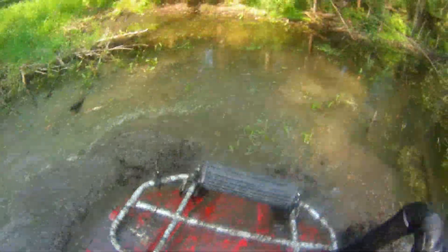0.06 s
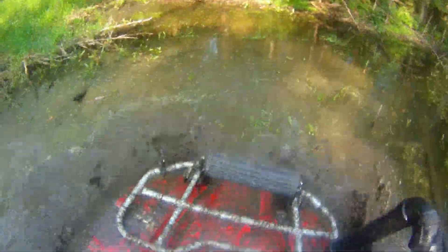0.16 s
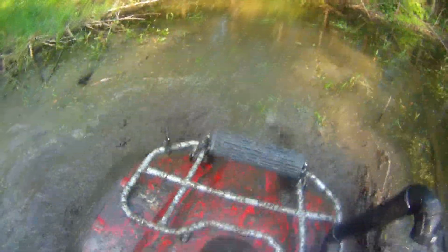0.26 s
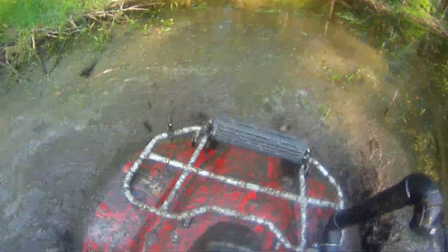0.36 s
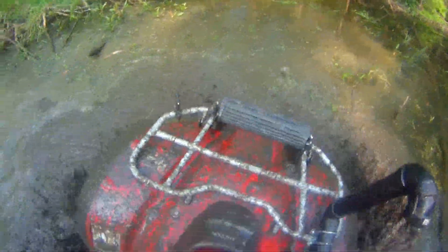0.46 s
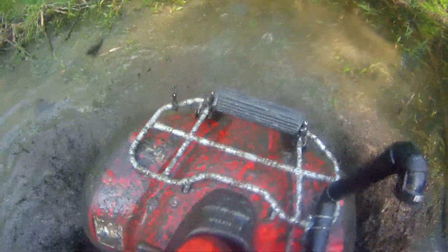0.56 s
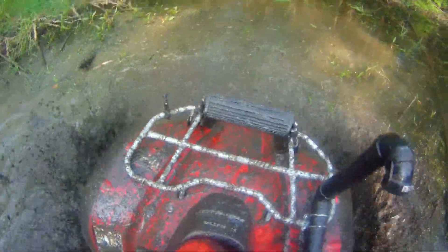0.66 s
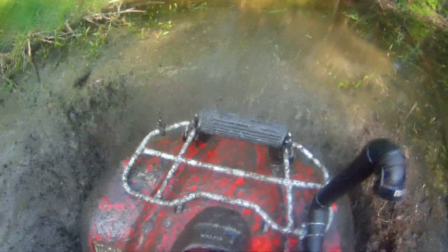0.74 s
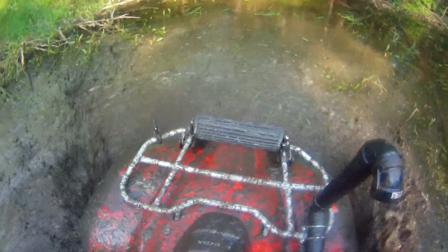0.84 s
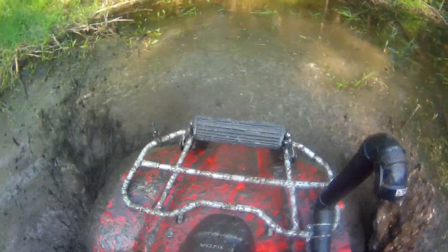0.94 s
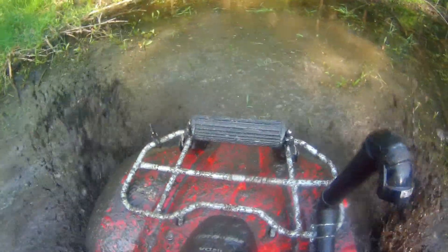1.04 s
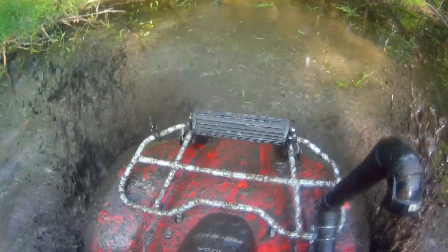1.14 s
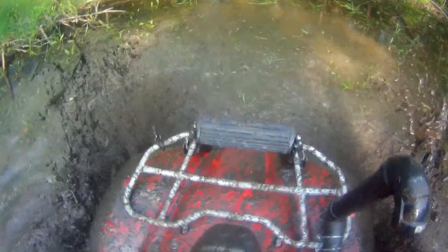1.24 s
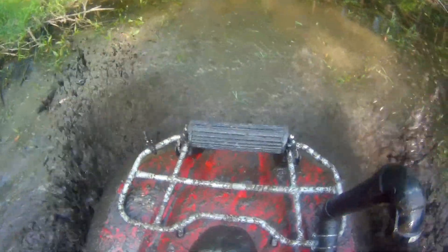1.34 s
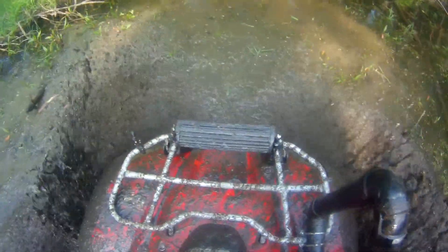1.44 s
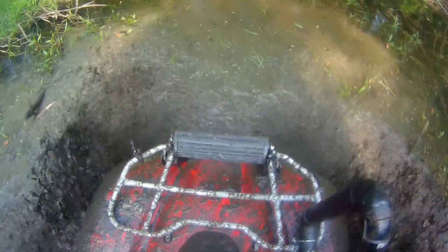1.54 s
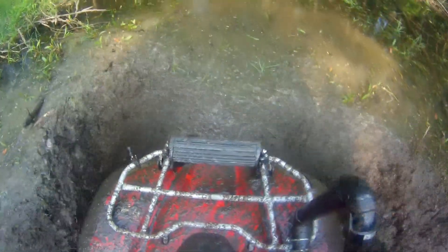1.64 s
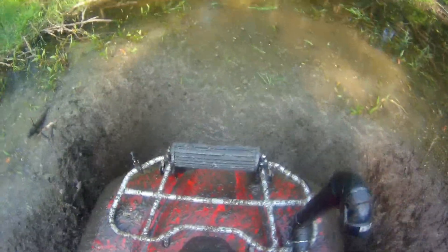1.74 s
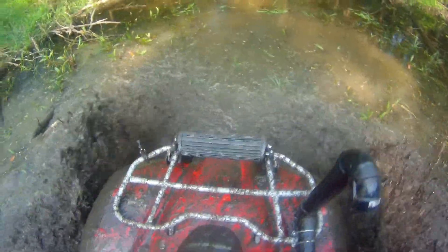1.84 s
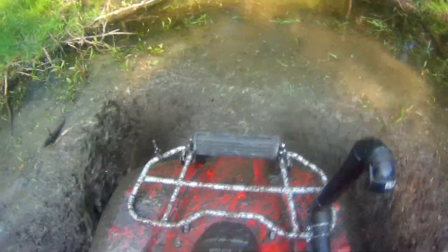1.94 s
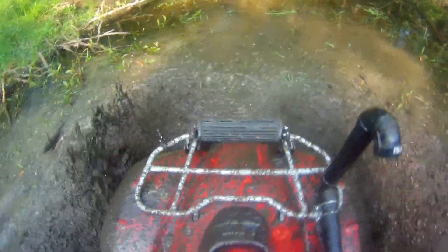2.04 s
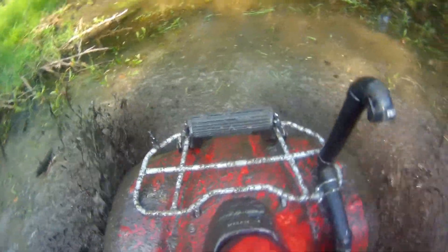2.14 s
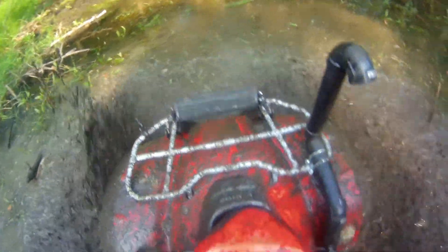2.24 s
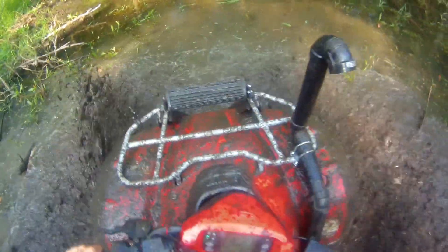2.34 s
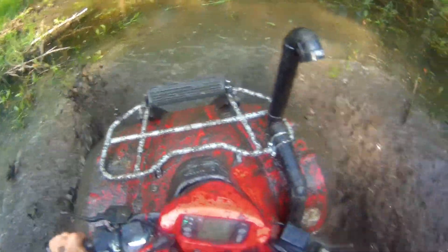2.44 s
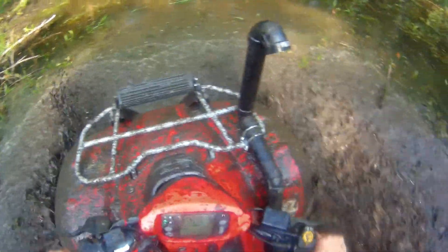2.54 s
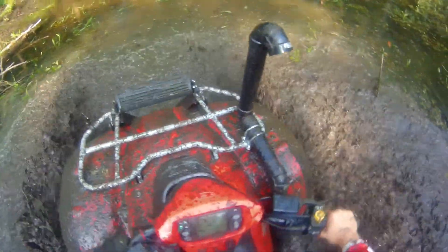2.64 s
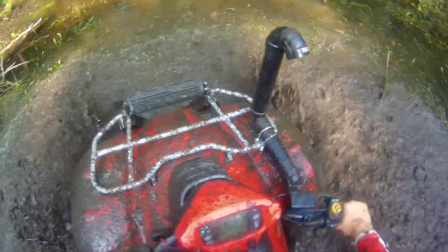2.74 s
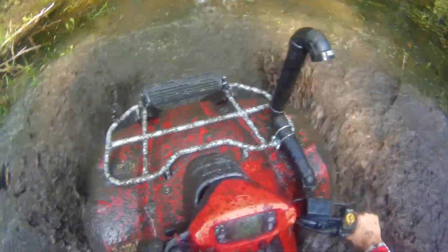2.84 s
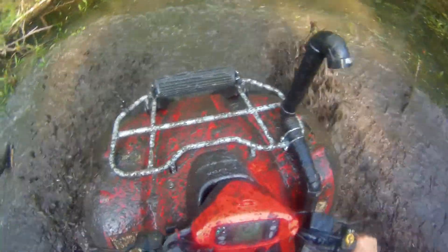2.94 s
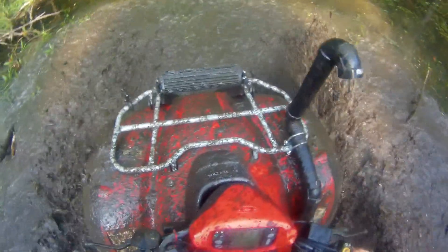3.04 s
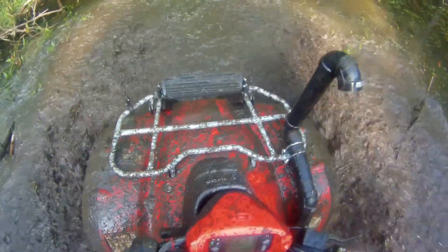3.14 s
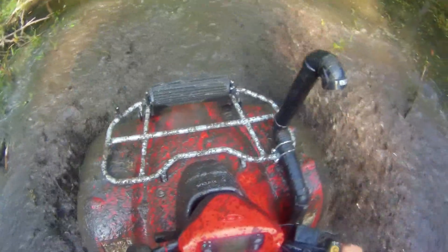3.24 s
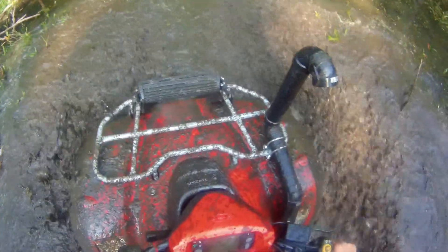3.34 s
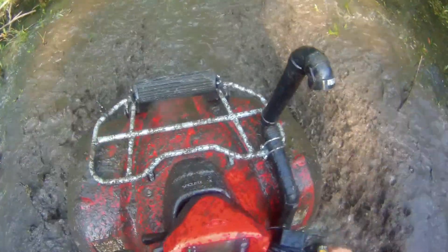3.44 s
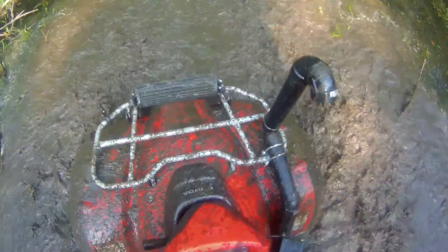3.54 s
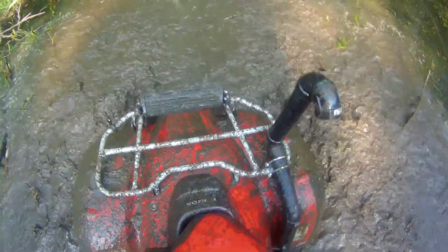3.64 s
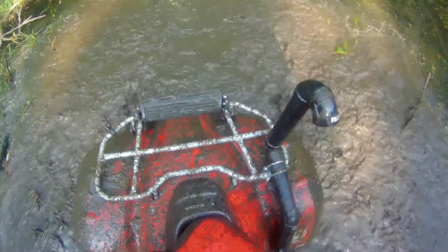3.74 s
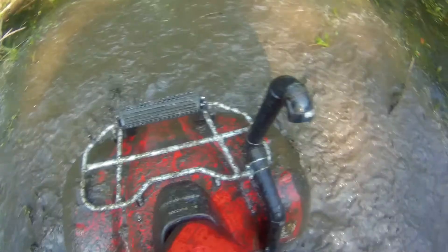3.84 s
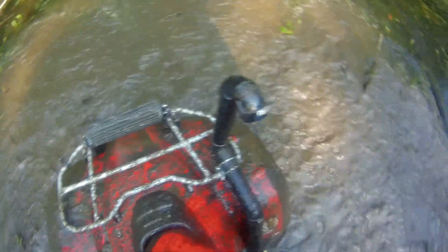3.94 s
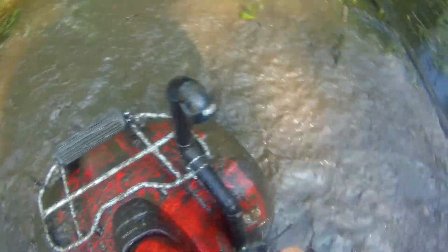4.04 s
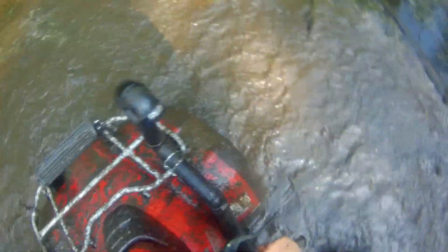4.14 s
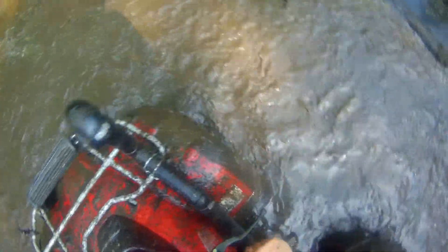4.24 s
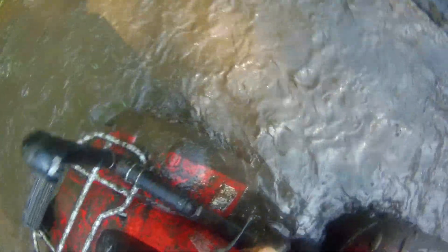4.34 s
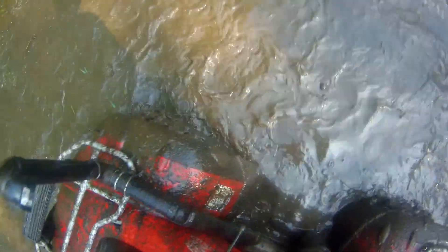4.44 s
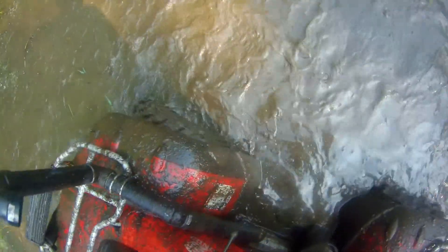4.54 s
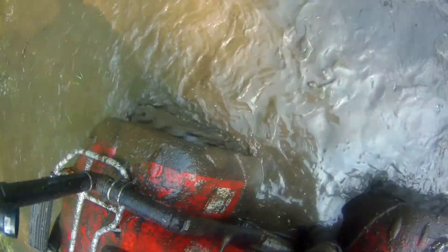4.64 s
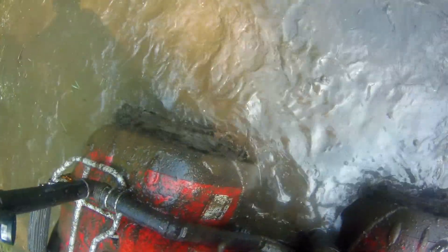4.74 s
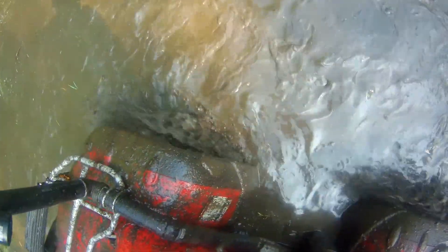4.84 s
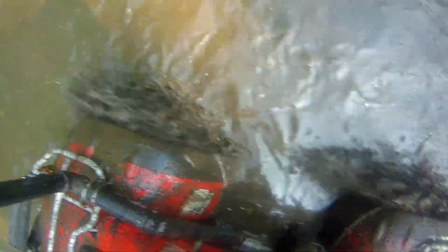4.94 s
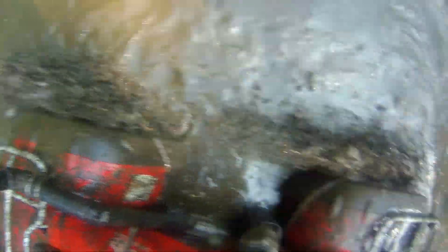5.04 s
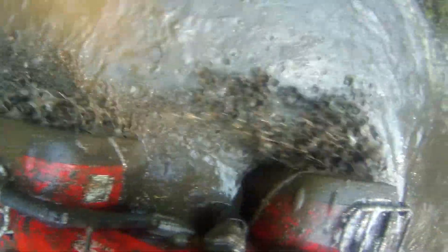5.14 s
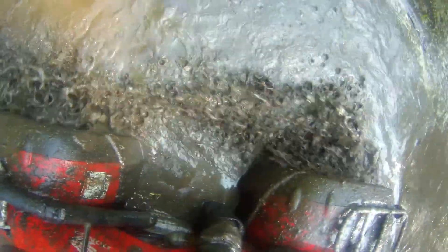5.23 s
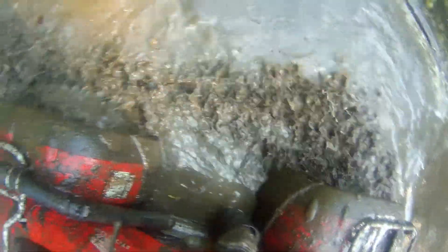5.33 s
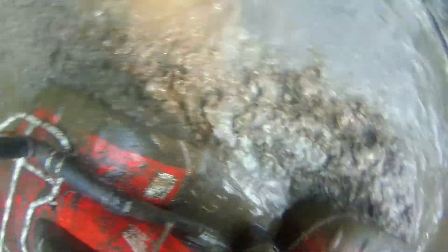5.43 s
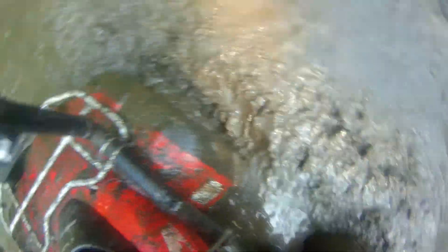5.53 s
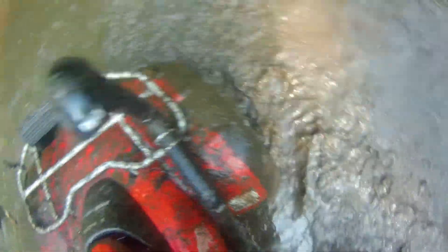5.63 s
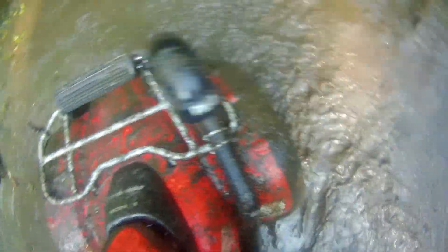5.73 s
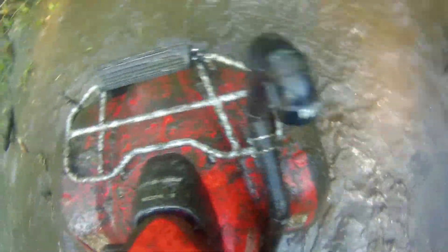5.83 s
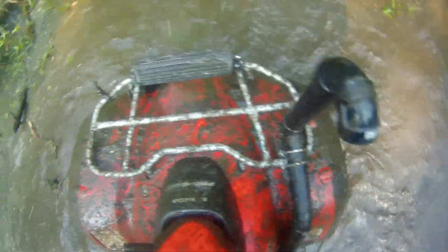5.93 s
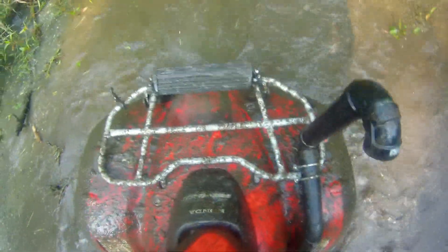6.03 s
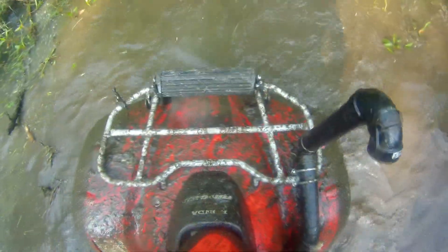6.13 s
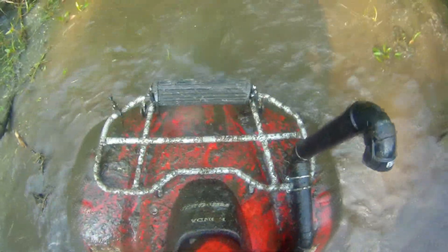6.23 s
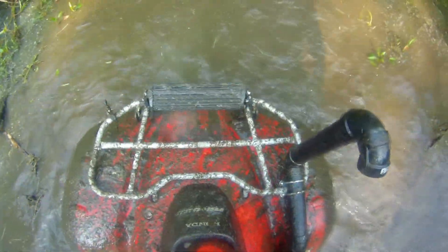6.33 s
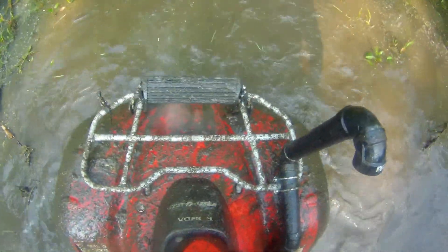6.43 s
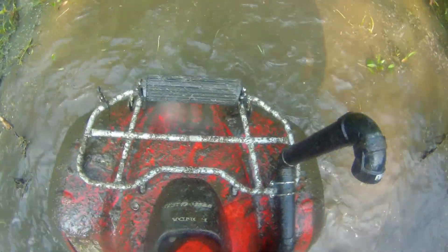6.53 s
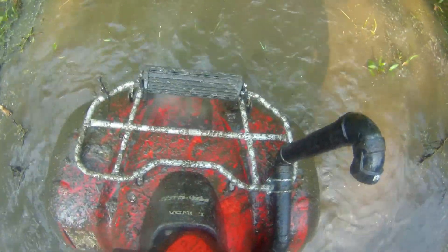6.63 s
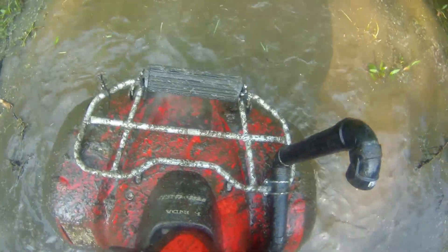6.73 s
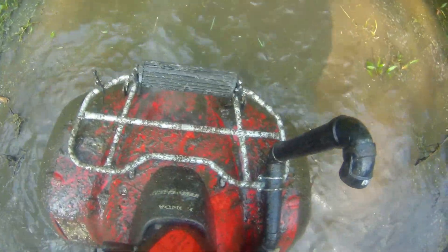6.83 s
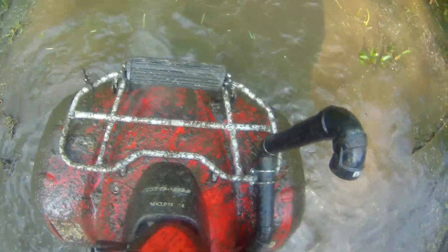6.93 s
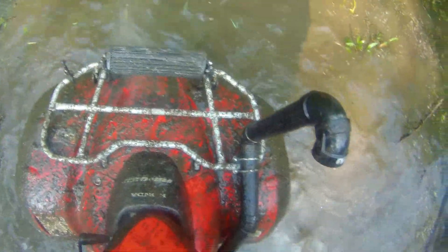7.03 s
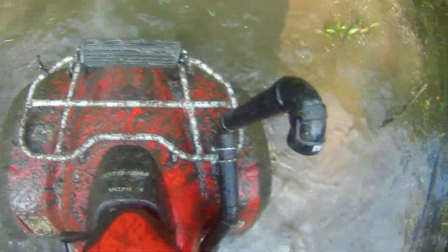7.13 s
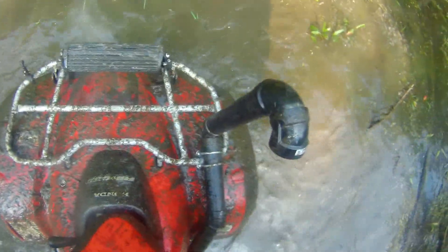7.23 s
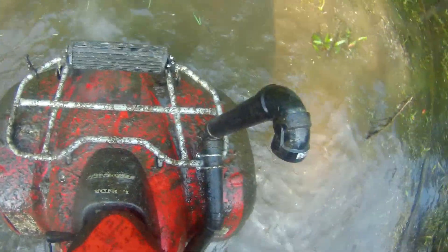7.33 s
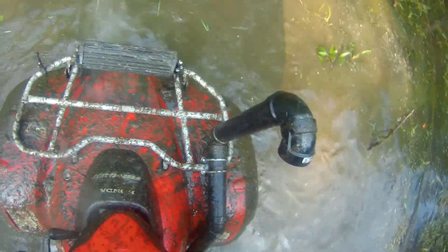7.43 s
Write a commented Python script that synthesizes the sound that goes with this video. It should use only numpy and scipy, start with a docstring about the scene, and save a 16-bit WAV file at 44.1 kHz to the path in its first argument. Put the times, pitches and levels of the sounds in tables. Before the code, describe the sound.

A quad bike's single-cylinder engine holds a harsh, buzzing full-throttle drone for about three seconds while tyres fling hissing mud and water. The throttle snaps shut, the note sinks to separate thumps with a grinding wet rasp, then comes a small blip, a strong barking one and, after a near stall, a last short double squeeze before slow idling. Close on the rider, outdoors, boxed in by a hollow waterproof case.

```python
"""A single-cylinder quad bike pulls at full throttle through a mud hole: a rough, droning engine note.
After three seconds it drops to a thumping idle, is blipped three times and almost stalls.
The engine is built from tones and from clicks and bursts of noise, one per firing, that ring resonances.
Shaped noise makes the mud and water flung by the tyres, and short ringing noises make clods and droplets.
It is heard inside a waterproof camera case, which adds hollow resonances to many layers and echoes the treble."""
import sys
import numpy as np
from scipy import signal
from scipy.fft import rfft, irfft
from scipy.io import wavfile
from scipy.ndimage import uniform_filter1d

SR = 44100
rng = np.random.default_rng(int(sys.argv[2]) if len(sys.argv) > 2 else 0)


def wav_out(sig):
    """Save sig, one row per channel (or a flat mono array), as 16-bit PCM at SR to the path in sys.argv[1]."""
    wavfile.write(sys.argv[1], SR, np.round(np.clip(np.atleast_2d(sig).T, -1, 1) * 32767).astype(np.int16))


N = 329868
TIME = np.arange(N) / SR

# bands used to set layer levels: (lowest [Hz], highest [Hz])
BASS, LOW, MID, TOP, ALL = (60, 180), (220, 900), (1050, 2600), (7500, 14000), (20, 16000)


def gain_of(db):
    """Turns decibels into an amplitude factor."""
    return np.exp(np.asarray(db) * (np.log(10) / 20))


def evened(x):
    """Scales a sound to an rms of one."""
    return x / np.sqrt(np.mean(x ** 2) + 1e-20)


def curve(rows, column=1):
    """Joins one column of a table by straight lines in time."""
    table = np.array(rows)
    return np.interp(TIME, table[:, 0], table[:, column])


def wander(hz, size=4096):
    """Slow random wavering of rms one; movement faster than about hz fades out."""
    f = np.fft.rfftfreq(size, N / SR / size)
    slow = irfft(rfft(rng.standard_normal(size)) * np.exp(-(f / hz) ** 2))
    return evened(np.interp(TIME, np.linspace(0, N / SR, size), slow))


def swell(s, rise_s, fall_s):
    """A smooth hump of height one at s seconds."""
    distance = (TIME - s) / np.where(TIME < s, rise_s, fall_s)
    return np.exp(-np.minimum(distance ** 2, 20))


def causal(gain):
    """Gives a set of gains the phase of something struck: a sudden start, then ringing."""
    log_gain = np.log(np.maximum(gain, 1e-5))
    circle = np.concatenate([log_gain, log_gain[-2:0:-1]])
    return np.exp(np.conj(signal.hilbert(circle)))[:len(gain)]


# hollow resonances of the camera case: (pitch [Hz], width [Hz], lift [dB])
CASE_RESONANCES = [(372, 34, 5.5), (1183, 70, 5.5), (1302, 103, 11.5), (1636, 123, 11), (1760, 50, 11.5),
                   (1935, 120, 9), (2390, 90, 10), (3530, 2740, 5), (6180, 960, 3.5), (10860, 2550, 9.5)]


def heard(x, spectrum, band, size=8192):
    """Colours a sound by its own spectrum and by the case, with rms one inside the band."""
    f = np.fft.rfftfreq(size, 1 / SR)
    hz, db = np.transpose(spectrum)
    own_gain = gain_of(np.interp(np.log(f + 1), np.log(hz), db))
    case_power = 1
    for at, width, lift in CASE_RESONANCES:
        case_power = case_power + (gain_of(lift) ** 2 - 1) / (1 + (2 * (f - at) / width) ** 2) ** 2
    coloured = signal.oaconvolve(x, irfft(causal(own_gain * np.sqrt(case_power))))[:N]
    f = np.fft.rfftfreq(N, 1 / SR)
    inside = rfft(coloured)[(f > band[0]) & (f < band[1])]
    return coloured * N / np.sqrt(2 * np.sum(abs(inside) ** 2))


def resonate(x, hz, width):
    """A resonance whose pitch may follow a curve."""
    turn = np.exp(2j * np.pi * np.cumsum(hz * np.ones(len(x))) / SR)
    r = np.exp(-np.pi * width / SR)
    return 2 * (turn * signal.lfilter([1 - r], [1, -r], x / turn + 1e-18)).real


def ringing(x, hz, width):
    """A fixed resonance with steep sides, rms one."""
    pole = np.exp((2j * np.pi * hz - np.pi * width) / SR)
    stage = [1, -pole.real, 0, 1, -2 * pole.real, abs(pole) ** 2]
    return evened(signal.sosfilt([stage, stage], x + 1e-18))


# engine speed through the pull, the blips and the near stall: (time [s], rate [firings per s])
ENGINE_SPEED = [(0.0, 37.49), (0.302, 38.86), (1.003, 41.02), (1.301, 40.47), (1.697, 40.94),
                (2.596, 38.47), (3.085, 39.0), (3.113, 26.55), (3.405, 14.88), (3.766, 21.27),
                (4.239, 11.84), (4.547, 27.78), (4.866, 33.54), (5.21, 11.57), (5.458, 8.23), (5.774, 9.55),
                (6.183, 24.25), (6.639, 12.43), (7.153, 12.78), (7.277, 9.06), (7.48, 11.01)]


def firings(turns, uneven_db):
    """One click per firing, of uneven strength, with the same mean power at any speed."""
    at = np.flatnonzero(np.diff(np.floor(turns)))
    strength = gain_of(uneven_db * rng.standard_normal(len(at)))
    clicks = np.zeros(N)
    clicks[at] = strength / np.sqrt(curve(ENGINE_SPEED)[at])
    return clicks


def gusts(turns, decay_s, steady, rise_s=.0008):
    """Noise that swells quickly at each firing and dies down to a steady share."""
    speed = curve(ENGINE_SPEED)
    age = (turns % 1) / speed  # seconds since the last firing
    puff = (1 - np.exp(-age / rise_s)) * np.exp(-age / decay_s) * (1 + rise_s / decay_s)
    power = steady ** 2 + speed * decay_s * (2 * steady + .5)
    return (steady + puff) / np.sqrt(power) * rng.standard_normal(N)


# squeezes of the throttle, one long pull and three blips, the last squeezed twice:
# (opens [s], shuts [s], opening [0-1], release [s],
#  pipe boom [dB], thump [dB], silencer chambers [dB], clatter [dB])
SQUEEZES = [(-1, 3.095, 1, .035, -.5, 0, 0, -.5), (3.45, 3.84, .39, .07, .3, 1.2, -2.5, -.5),
            (4.265, 4.93, .98, .038, -.8, .5, -1, .6), (5.92, 6.05, .85, .11, .1, -3, 2.5, 2.2),
            (6.12, 6.285, .33, .04, -.8, -4, 2, .5)]
BOOMS, THUMPS, CHAMBERS, CLATTERS = 4, 5, 6, 7  # places of the four level columns
OPEN_S = .085  # how quickly the engine answers the throttle


def throttle():
    """Throttle opening, 0-1: each squeeze rises, holds and dies away."""
    out = 0
    for opens, shuts, opening, release, *_ in SQUEEZES:
        rise = 1 - np.exp(-np.maximum(TIME - opens, 0) / OPEN_S)
        out = out + opening * rise * np.exp(-np.maximum(TIME - shuts, 0) / release)
    return np.clip(out, 0, 1)


def squeezed(column):
    """Gain from one level column of the squeezes: each holds until the throttle next opens."""
    rows = np.array(SQUEEZES)
    db = rows[np.searchsorted(rows[:, 0], TIME) - 1, column]
    return gain_of(uniform_filter1d(db, SR // 20))


FULL_HZ = 32  # firing rate above which speed adds no more loudness in the laws below


def loudness(law, gas):
    """Level in dB: lower at slow engine speeds, and changed by shutting the throttle."""
    top_db, shut_db, open_slope, shut_slope = law
    shut = 1 - gas
    octaves = np.maximum(np.log2(FULL_HZ / curve(ENGINE_SPEED)), 0)
    return top_db + shut * shut_db - octaves * (open_slope + shut * (shut_slope - open_slope))


# share of full load on the engine: (time [s], load [0-1])
ENGINE_LOAD = [(0, 0.95), (3.085, 1), (3.115, 0)]
# drone tones: (multiple of the firing rate, level when lugging [dB], level when running free [dB])
DRONE_ORDERS = [(1, -48.9, -47.1), (2, -54.9, -49.8), (3, -32.6, -32.6), (4, -48, -42), (5, -43.5, -40.2),
                (6, -50.9, -46.4), (7, -41.4, -36.2), (8, -54.7, -50.1), (9, -54.8, -37.7),
                (10, -49.7, -47.3), (11, -44.5, -45.2), (12, -52.0, -48.5), (13, -53.5, -61.2),
                (14, -65.7, -52.1), (15, -51.4, -49.7), (16, -57.9, -54.2), (17, -49.4, -49),
                (18, -48, -46.5), (19, -57.5, -61.5), (20, -54.8, -59.4), (21, -59.1, -56.2),
                (22, -57.3, -60.7), (23, -54.0, -52.3), (24, -55.5, -47.6), (25, -61.0, -60.4),
                (26, -58.8, -59.9), (27, -57, -51), (30, -52, -51), (34, -53, -52), (36, -59, -61),
                (39, -64, -64), (41, -53, -52), (44, -54, -53)]
# tones that swell or fade as the rider moves about the machine:
# (time [s], half length [s], multiple of the firing rate, change [dB])
ORDER_SWELLS = [(0.09, 0.25, 10, 13.7), (0.916, 0.3, 9, -4), (1.643, 0.41, 9, 2.5), (1.024, 0.11, 11, 5),
                (1.15, 0.16, 12, 4), (1.98, 0.19, 7, -7), (.18, .16, 34, 9), (.47, .4, 33, 12),
                (.35, .2, 42, 13), (.7, .2, 29, 7), (1.15, .22, 41, 12), (1.55, .3, 43, 7),
                (2.1, .2, 34, 11), (2.3, .3, 30, 10), (2.38, .12, 31, 10), (2.92, .22, 30, 11),
                (2.92, .15, 34, 7)]
LUGGING_HZ, FREE_HZ = 39.25, 40.5  # firing rates for the two balances of tones
ROUGH_PER_ORDER = .018  # turbulent gas blurs the high orders most [radians of waver per order]
STROKE_DB = 1.5  # uneven burning shakes the upper orders from stroke to stroke


def drone(turns, waver_db=2.0, drone_db=-0.1, dispersion=.11, jitter_turns=.0022):
    """Under load the pipe pulses merge into multiples of the firing rate (orders), balanced by speed."""
    listed, lugging, running = np.transpose(DRONE_ORDERS)
    orders = np.arange(1, listed[-1] + 1)
    lugging_db = np.interp(orders, listed, lugging)
    free_db = np.interp(orders, listed, running)
    free = np.clip((curve(ENGINE_SPEED) - LUGGING_HZ) / (FREE_HZ - LUGGING_HZ), 0, 1)
    phases = np.angle(causal(gain_of(np.pad(free_db, 1, "edge"))))[1:]
    wavers = [wander(7) for _ in range(7)]
    strokes = [wander(24) for _ in range(4)]
    cycle = turns % 1 + jitter_turns * wander(18)  # no two strokes take quite the same time
    out = np.zeros(N)
    for k in range(len(orders)):
        db = lugging_db[k] + free * (free_db[k] - lugging_db[k])
        db += waver_db * min((k + 1) / 10, 1) * wavers[k % len(wavers)]  # low orders are steadiest
        db += STROKE_DB * np.clip((k - 2) / 5, 0, 1) * (strokes[k // 3 % len(strokes)] - .4)
        for s, half, order, lift in ORDER_SWELLS:
            if round(order) == k + 1:
                db += lift * swell(s, half, half)
        lag = dispersion * (k + 1) ** 2  # the silencer smears each pulse: high orders leave later
        lag = lag + ROUGH_PER_ORDER * (k + 1) * wander(14)
        angle = 2 * np.pi * (k + 1) * cycle + phases[k] - lag
        out += gain_of(np.float32(db)) * np.cos(np.float32(angle))
    return np.sqrt(2) * gain_of(drone_db) * out * curve(ENGINE_LOAD)


def rattle(clicks, t60, build_s=.004, drift_hz=1.3, size=3000, count=3):
    """Each firing shakes frame and panels: a short dense ring that changes as the rider sways."""
    out, t = 0, TIME[:size]
    for _ in range(count):
        ring = rng.standard_normal(size) * gain_of(-60 * t / t60) * (1 - np.exp(-t / build_s))
        out = out + signal.oaconvolve(clicks * wander(drift_hz), ring / np.linalg.norm(ring))[:N]
    # the sway changes the colour while the slow level stays that of the clicks
    out_level = np.sqrt(uniform_filter1d(out ** 2, SR // 3) + 1e-12)
    click_level = np.sqrt(uniform_filter1d(clicks ** 2, SR // 3) + 1e-12)
    return evened(out / (out_level / click_level))


# colour of the knock, and of the ground mud later: (pitch [Hz], relative level [dB per Hz])
KNOCK_SPECTRUM = [(100, -65), (500, 2), (800, -4), (1120, 12), (1300, 9), (1480, 4), (2200, 0),
                  (2700, -6.5), (4200, -11.5), (5000, -25), (7000, -37), (11000, -43), (15000, -55)]
# colour of the rasp: (pitch [Hz], relative level [dB per Hz])
RASP_SPECTRUM = [(60, -7), (200, -2), (450, 1), (540, -5), (700, -1), (850, -4), (1150, 2), (1480, -1),
                 (2200, 1), (2700, -4), (4200, -5), (5000, -20), (7000, -13), (11000, -48), (15000, -40)]
# clatter loudness: (flat out [dB], change with throttle shut [dB],
#  loss per octave of speed when open [dB], the same when shut [dB])
CLATTER_LOUDNESS = (-32.8, -11.5, 22, 14.5)
# two howls of the intake snorkel, upper then lower:
# (pitch [Hz], width [Hz], level beside the clatter before flares and flutter [dB])
INTAKE_HOWLS = [(1645, 140, -12.5), (1290, 80, -15)]
# moments when the howl flares: (time [s], half length [s], lift of the upper [dB], lift of the lower [dB])
HOWL_FLARES = [(.22, .08, 0, 5), (.303, .012, 10, 3), (.382, .014, 8, 0), (.35, .14, 4, 0), (.6, .22, 0, 6),
               (1.2, .2, 5, 0), (4.55, .12, 0, 8), (4.803, .012, 0, 6), (4.86, .1, 5, 9),
               (6.08, .08, 11, 6), (6.28, .1, 6, 8), (7.1, .35, 9, 0)]
HOWL_FLUTTER_DB = 3


def clatter(turns, gas, knock_db=-7, knock_load_db=-2.5, rasp_db=-5.3, rasp_load_db=2):
    """Burning knocks ring the frame; gas and moving parts rasp in step, and the snorkel howls."""
    level_db, load = loudness(CLATTER_LOUDNESS, gas), curve(ENGINE_LOAD)
    effort = np.clip((level_db + 55) / 20, .2, 1)
    clicks = firings(turns, uneven_db=.8)
    # with less effort the knock softens; the rasp evens out both at idle and under full load
    knock = heard(rattle(clicks, t60=0.13), KNOCK_SPECTRUM, MID)
    knock = knock * effort * gain_of(knock_db + knock_load_db * load)
    rasp = heard(gusts(turns, decay_s=.011, steady=(.45 + .85 * load) / effort), RASP_SPECTRUM, MID)
    rasp = rasp * gain_of(1.1 * wander(22)) * gain_of(rasp_db + rasp_load_db * load)
    intake = .65 * evened(clicks) * effort
    intake = intake + gusts(turns, decay_s=.015, steady=(.5 + .4 * load) / effort)
    howl = 0
    for k, (hz, width, db) in enumerate(INTAKE_HOWLS):  # each comes and goes in its own bursts
        flare_db = sum(lifts[k] * swell(s, half, half) for s, half, *lifts in HOWL_FLARES)
        howl = howl + ringing(intake, hz, width) * gain_of(db + flare_db + HOWL_FLUTTER_DB * wander(14))
    return gain_of(level_db) * squeezed(CLATTERS) * (knock + rasp + howl)


# engine metal that rings at the same pitch at any speed:
# (pitch [Hz], width [Hz], level before the speed factor [dB], steady share between valve ticks [0-1])
METAL_RINGS = [(2445, 75, -66, .4), (4610, 170, -72, .2)]


def metal(turns, valve_lag=.3, stall_hz=8.5, quiet_span_hz=4):
    """A valve shuts about a third of a cycle after each firing and rings metal: mute near a stall."""
    ring = 0
    for hz, width, db, steady in METAL_RINGS:
        ticks = gusts(turns - valve_lag, decay_s=.012, steady=steady)
        ring = ring + gain_of(db) * ringing(ticks, hz, width)
    ring = ring * gain_of(1.6 * wander(16))
    speed = curve(ENGINE_SPEED)
    louder = np.minimum(speed / 20, 1.5) ** 2
    return ring * louder * np.clip((speed - stall_hz) / quiet_span_hz, 0, 1)


# colour of the spray: (pitch [Hz], relative level [dB per Hz])
SLOSH_SPECTRUM = [(80, -3), (300, 0), (600, 0), (1100, 1), (1500, 2), (3000, 0.5), (4500, 1.5), (7000, -3),
                  (8500, -9), (11000, -11), (13500, -16.5), (15500, -26)]
# sheets of muddy water that come down after a hard pull: (thickest [s], level [dB], rise [s], fall [s])
WATER_SHEETS = [(3.42, -51.2, 3.0, .38), (4.98, -55, .42, .54), (5.38, -49, .1, .15)]
# fine spray from the tread: level at FULL_HZ, change per octave of speed, and flight time
SPRAY_DB, SPRAY_DB_PER_OCTAVE, SPRAY_FLIGHT_S = -62.5, 11, .05


def spray(drops_per_s=2500, size_db=3.5, grainy=0.56, lumpy_db=1.1):
    """Hiss and countless small clicks follow the engine speed a moment late; whole sheets come down."""
    sizes = gain_of(size_db * np.minimum(rng.exponential(1, N), 5)) * rng.choice([-1, 1], N)
    drops = sizes * (rng.random(N) < drops_per_s / SR)
    wet = heard(rng.standard_normal(N) + grainy * evened(drops), SLOSH_SPECTRUM, TOP)
    tyres = np.interp(TIME - SPRAY_FLIGHT_S, TIME, curve(ENGINE_SPEED))
    power = gain_of(SPRAY_DB + SPRAY_DB_PER_OCTAVE * np.log2(tyres / FULL_HZ)) ** 2
    power += sum((gain_of(db) * swell(s, rise, fall)) ** 2 for s, db, rise, fall in WATER_SHEETS)
    return wet * np.sqrt(power) * gain_of(lumpy_db * wander(25))


# colour of the stirred water: (pitch [Hz], relative level [dB per Hz])
WATER_SPECTRUM = [(25, -9), (70, 2.5), (150, -1.5), (400, -7.5), (900, -9.5), (2000, -35), (5000, -38),
                  (9000, -32.5), (11000, -44), (15000, -33)]


def rumble(turns, shake_db=-52, rock_db=-56, rock_hz=46, water_db=-56.5):
    """The labouring machine shakes the camera, firings rock the frame, and stirred water washes round."""
    shake = ringing(rng.standard_normal(N), 30, width=30)
    rock = ringing(evened(firings(turns, uneven_db=2)) + .5 * rng.standard_normal(N), rock_hz, width=32)
    water = heard(rng.standard_normal(N), WATER_SPECTRUM, ALL) * gain_of(.7 * wander(8))
    load = curve(ENGINE_LOAD)
    return shake * gain_of(shake_db) * load + rock * gain_of(rock_db) * (1 - load) + water * gain_of(water_db)


# the pipe rings higher on hot gas, and sinks on the overrun and near a stall: (time [s], pitch [Hz])
PIPE_PITCH = [(3.11, 125), (3.18, 108), (3.28, 92), (3.45, 108), (3.7, 123), (3.95, 116), (4.2, 106),
              (4.4, 121), (4.6, 125), (4.9, 134), (4.97, 112), (5.15, 93), (5.45, 84), (5.7, 92),
              (5.95, 120), (6.2, 123), (6.42, 118), (7.15, 113), (7.4, 92)]


def along_pipe(x, reflect, trip_periods=1.03, count=3):
    """A blow runs up and down the pipe, weaker on each return; hot gas shortens the trip."""
    trip_s = trip_periods / curve(PIPE_PITCH)
    out = x
    for k in range(1, count + 1):
        out = out + reflect ** (k * (k + 1) / 2) * np.interp(TIME - k * trip_s, TIME, x, left=0)
    return out


OVERRUN_S = .5  # time constant of the coasting (overrun) after the throttle drops


def overrun(gas):
    """How far the throttle has just dropped below its recent average, 0-1."""
    keep = np.exp(-1 / (OVERRUN_S * SR))
    return np.maximum(signal.lfilter([1 - keep], [1, -keep], gas) - gas, 0)


# colour of the pipe's boom: (pitch [Hz], relative level [dB per Hz])
BOOM_SPECTRUM = [(20, -16), (45, 1), (70, -1.5), (110, 8.5), (170, 4), (230, 10), (300, -14), (450, -14),
                 (600, -26), (2000, -70)]
# boom loudness: (flat out [dB], change with throttle shut [dB],
#  loss per octave of speed when open [dB], the same when shut [dB])
BOOM_LOUDNESS = (-36.5, 4.5, 1, 12.2)
# the pipe misses a beat as the throttle snaps shut: (time [s], half length [s])
MISSED_BEATS = [(3.108, .013), (4.94, .013)]


def pipe(turns, gas, lead_s=.004, second_share=.34, thump_db=-6, thump_hz=220, thump_lag_s=.002,
         overrun_db=2.5, overtone_ratio=2.2, overtone_db=-7.5):
    """Firings thump the pipe; on the overrun it booms with an overtone, both sinking as the gas cools."""
    speed, pitch, coasting = curve(ENGINE_SPEED), curve(PIPE_PITCH), overrun(gas)
    early = turns + lead_s * speed  # the pressure builds before the crack
    fast = np.clip(speed / 28, 0, 1) ** 2
    clicks = evened(firings(early, uneven_db=.8))
    # a weaker gas pulse later in the cycle
    second = second_share * fast * (1 - coasting) * evened(firings(early - .33, uneven_db=1))
    drive = clicks + .26 * gusts(early, decay_s=.02, steady=.25)
    tone = resonate(drive + second, pitch, width=14)
    boom = heard(tone, BOOM_SPECTRUM, BASS) * (1 - .45 * coasting)
    boom += gain_of(overrun_db) * coasting * evened(resonate(tone, pitch, width=45))  # a purer, longer ring
    overtone_hz = overtone_ratio * pitch
    overtone = resonate(resonate(drive, overtone_hz, width=40), overtone_hz, width=40)
    boom += gain_of(overtone_db) * coasting * evened(overtone)
    late = turns - thump_lag_s * speed
    puff = evened(firings(late, uneven_db=1)) + .4 * gusts(late, decay_s=.012, steady=.2)
    thump = gain_of(thump_db) * ringing(puff, thump_hz, width=85) * (1 - .5 * coasting)
    beating = 1 - sum(swell(s, half, half) for s, half in MISSED_BEATS)
    out = (boom * squeezed(BOOMS) + thump * squeezed(THUMPS)) * beating
    return out * gain_of(loudness(BOOM_LOUDNESS, gas)) * (1 - curve(ENGINE_LOAD))


# colour of the bark: (pitch [Hz], relative level [dB per Hz])
BARK_SPECTRUM = [(60, -14), (150, -6), (220, 0), (280, 4), (340, -1), (430, 1), (540, -8), (700, -5.5),
                 (820, -12.5), (950, -11), (1200, -28), (2500, -55), (8000, -80)]
# colour of the crack: (pitch [Hz], relative level [dB per Hz])
CRACK_SPECTRUM = [(300, -1), (750, 5), (1100, -4), (2000, 1), (2800, -6), (3800, 1.5), (5000, -7),
                  (6500, -6), (8500, -21), (11000, -24), (15000, -29)]
# bark loudness: (flat out [dB], change with throttle shut [dB],
#  loss per octave of speed when open [dB], the same when shut [dB])
BARK_LOUDNESS = (-31, -8, 2, 16.5)
# silencer chambers that ring on after a firing:
# (pitch [Hz], width [Hz], level beside the bark before throttle scaling [dB])
SILENCER_CHAMBERS = [(382, 36, -8), (462, 60, -11), (590, 70, -17), (950, 200, -22)]


def exhaust(turns, gas, crack_db=-9.9, crack_shut_db=-27, crack_rise_s=.002, thud_db=-15.5,
            second_share=0.33, ring_lag=.13, ring_shut=1.1, bark_shut=.15, bark_open=.7):
    """Firings bark down the pipe and crack as the throttle opens; the silencer answers a little later."""
    bark_level = loudness(BARK_LOUDNESS, gas)
    fast = np.clip(curve(ENGINE_SPEED) / 28, 0, 1) ** 2
    clicks = evened(firings(turns, uneven_db=.9))
    # a weaker gas pulse later in the cycle
    second = second_share * fast * evened(firings(turns - .33, uneven_db=1))
    breath = .44 * gusts(turns, decay_s=.014, steady=.22)
    reflect = .78 - .26 * fast
    bark = heard(along_pipe(clicks + breath, reflect) + second, BARK_SPECTRUM, LOW)
    late = evened(firings(turns - ring_lag, uneven_db=1.2)) + breath
    ring = sum(gain_of(db) * ringing(late, hz, width) for hz, width, db in SILENCER_CHAMBERS)
    ring = ring * squeezed(CHAMBERS) * (ring_shut + 2.4 * gas) * (1.05 - gas)  # most at part throttle
    bark = bark * (bark_shut + bark_open * gas) + ring
    crack = heard(gusts(turns + .045, decay_s=.01, steady=.08, rise_s=crack_rise_s), CRACK_SPECTRUM, ALL)
    crack_level = bark_level + crack_db + crack_shut_db * (1 - gas)
    thud = (np.sin(2 * np.pi * turns) + .9 * np.sin(4 * np.pi * turns)) * fast  # firing rate and octave
    out = bark * gain_of(bark_level) + crack * gain_of(crack_level) + thud * gain_of(bark_level + thud_db)
    return out * (1 - curve(ENGINE_LOAD))


# the coasting tyres grind through thick mud: (loudest [s], level [dB], rise [s], fall [s])
MUD_CHURNS = [(3.13, -43, .07, .14), (3.55, -48.5, .28, .36), (5.07, -50, .1, .13), (5.55, -57, .15, .17)]


def churn(lumpy_db=1.5):
    """Mud ground between tread and wheel arch rasps for a moment as the wheels slow: lumpy noise."""
    level = sum(gain_of(db) * swell(s, rise, fall) for s, db, rise, fall in MUD_CHURNS)
    return heard(rng.standard_normal(N), KNOCK_SPECTRUM, MID) * level * gain_of(lumpy_db * wander(25))


def add(mix, s, sound):
    """Mixes a sound in at s seconds."""
    part = mix[round(s * SR):][:len(sound)]
    part += sound[:len(part)]


# droplets that ping on the case: (time [s], level [dB], pitch [Hz], width [Hz], length [s])
DROPLETS = [(4.165, -57, 10630, 1300, 0.015), (6.528, -65, 10270, 253.7, 0.048)]
# clods of mud that land close by: (time [s], level [dB], pitch [Hz], width [Hz], time to fall 60 dB [s])
MUD_CLODS = [(5.002, -31, 1000, 1000, .016), (5.356, -25.5, 2700, 1800, .022)]


def splashes(size=3000):
    """Droplets ping on the case and clods slap down: short noises, each through one resonance."""
    out, t = np.zeros(N), TIME[:size]
    for s, db, hz, width, length in DROPLETS:
        ping = ringing(rng.standard_normal(size), hz, width)
        add(out, s, ping * gain_of(db) * np.sin(np.pi * np.minimum(t / length, 1)))
    for s, db, hz, width, t60 in MUD_CLODS:
        add(out, s, ringing(rng.standard_normal(size), hz, width) * gain_of(db - 60 * t / t60))
    return out


def scene():
    """Every engine sound follows the same crank, and the throttle shapes most of them."""
    turns = .58 + np.cumsum(curve(ENGINE_SPEED)) / SR  # firing cycles so far, begun partway through one
    gas = throttle()
    engine = drone(turns) + clatter(turns, gas) + metal(turns) + pipe(turns, gas) + exhaust(turns, gas)
    return (engine + spray() + rumble(turns) + churn() + splashes())[None]


# short echoes of the treble inside the case: (delay [s], gain [amplitude factor])
TREBLE_ECHOES = [(.0013, 0.15), (.0031, -0.22), (.0057, 0.28)]


def echoed(x, echoes):
    """Adds delayed copies of a sound."""
    return x + sum(gain * np.interp(TIME - delay, TIME, x, left=0) for delay, gain in echoes)


EDGE_HZ = 15750  # upper edge of the camera's band


def record(dry):
    """The treble bounces inside the case; then the camera cuts the very top."""
    high_pass = signal.butter(2, 2800, "high", fs=SR, output="sos")
    treble = signal.sosfiltfilt(high_pass, dry[0])
    boxed = dry[0] - treble + echoed(treble, TREBLE_ECHOES)
    low_pass = signal.firwin(511, EDGE_HZ, window=("kaiser", 9), fs=SR)
    return signal.oaconvolve(boxed, low_pass, "same")[None]


dry = scene()
out = record(dry)
wav_out(out)
```